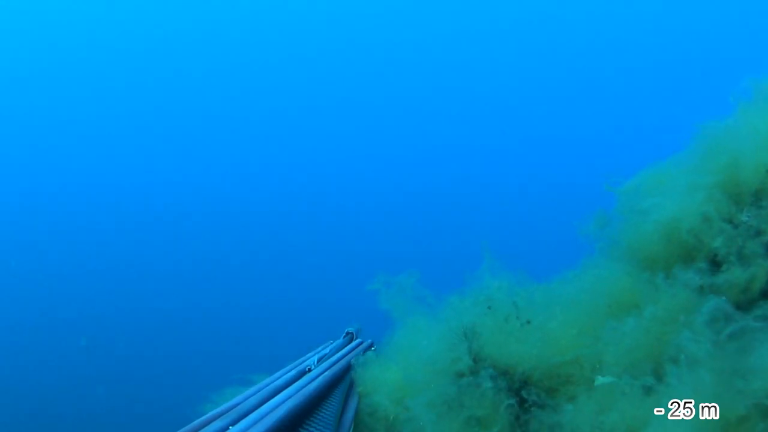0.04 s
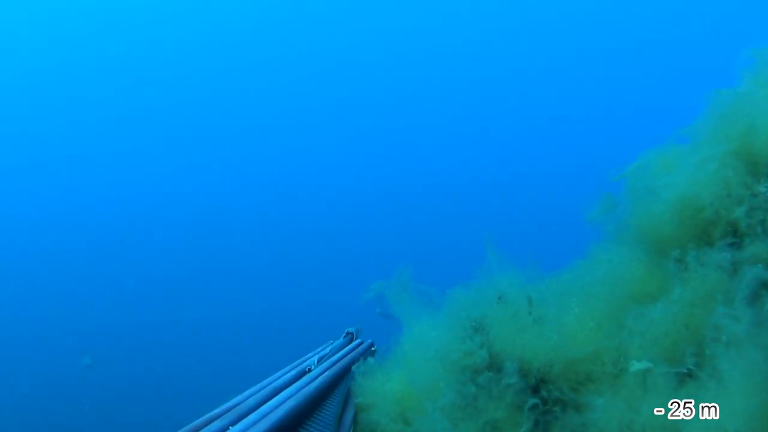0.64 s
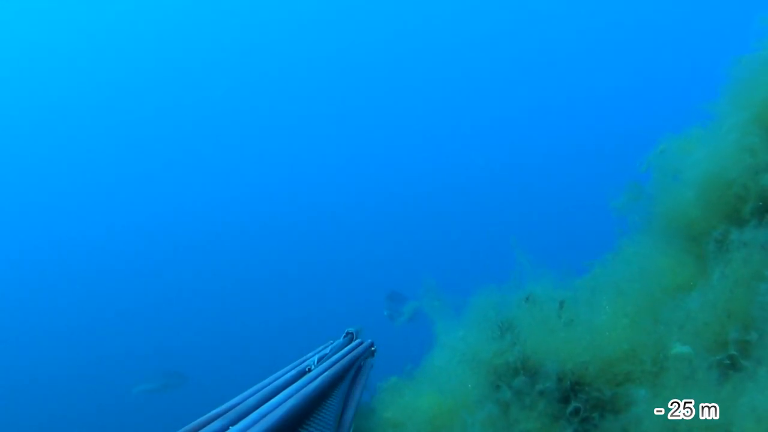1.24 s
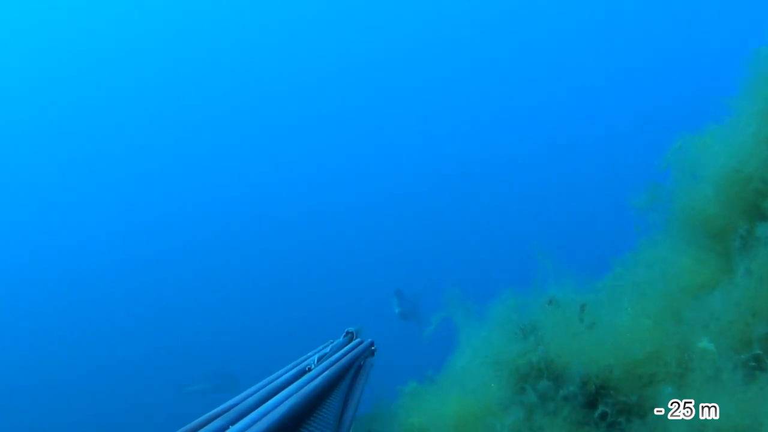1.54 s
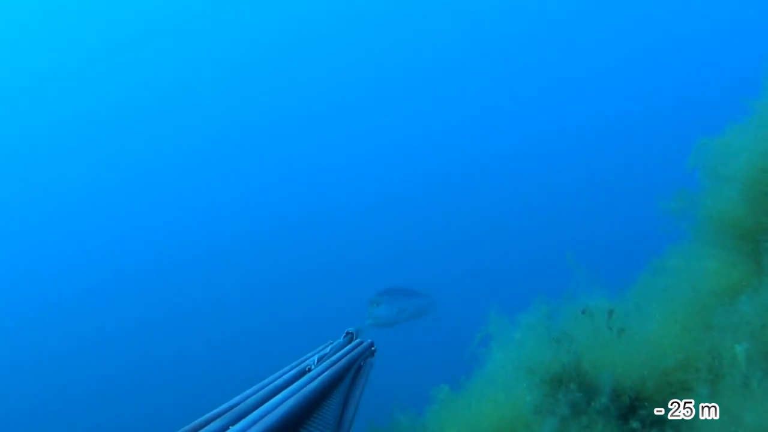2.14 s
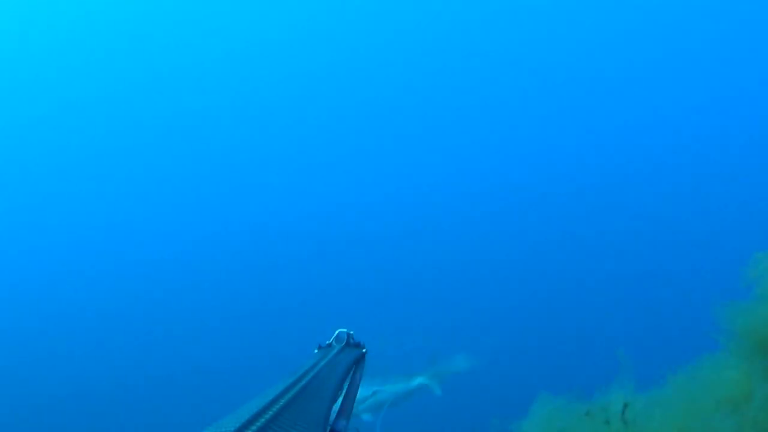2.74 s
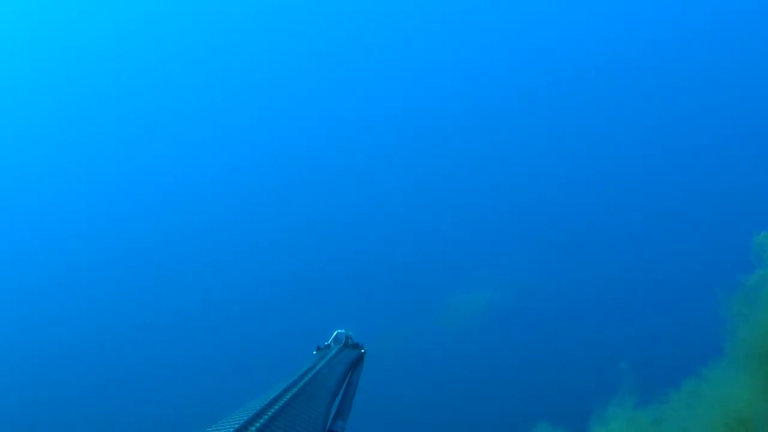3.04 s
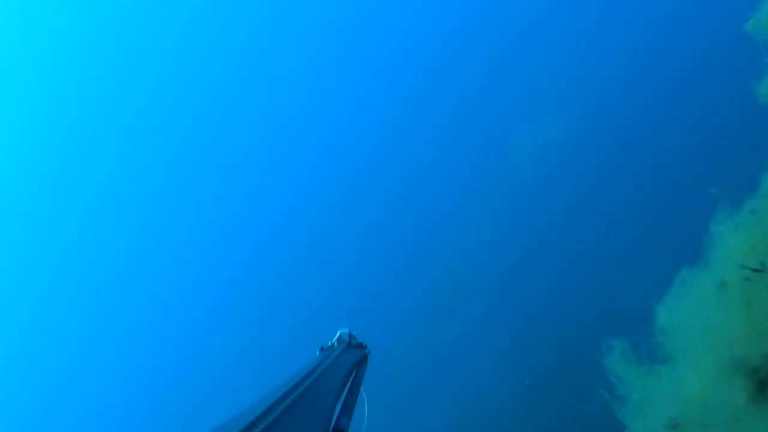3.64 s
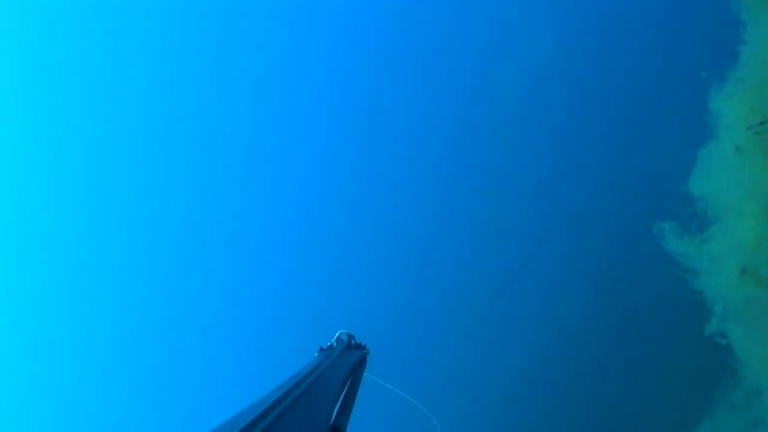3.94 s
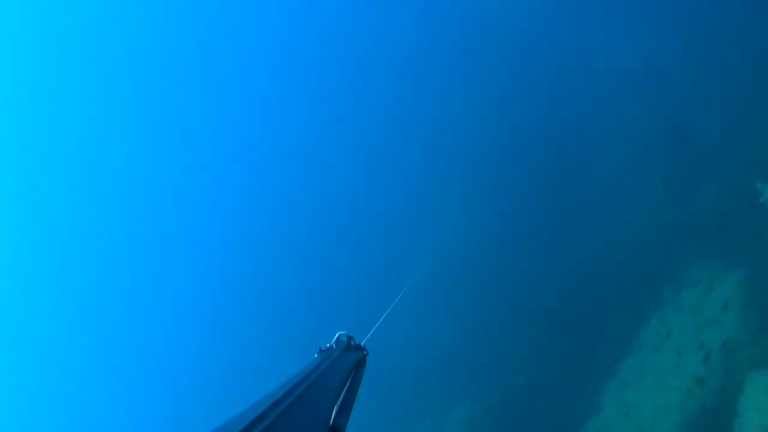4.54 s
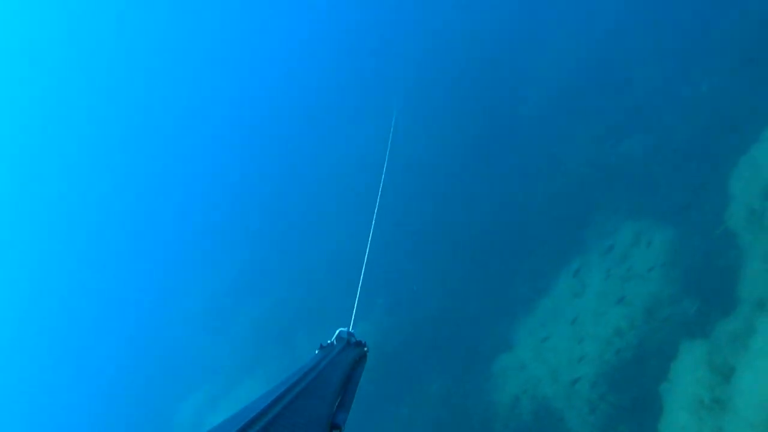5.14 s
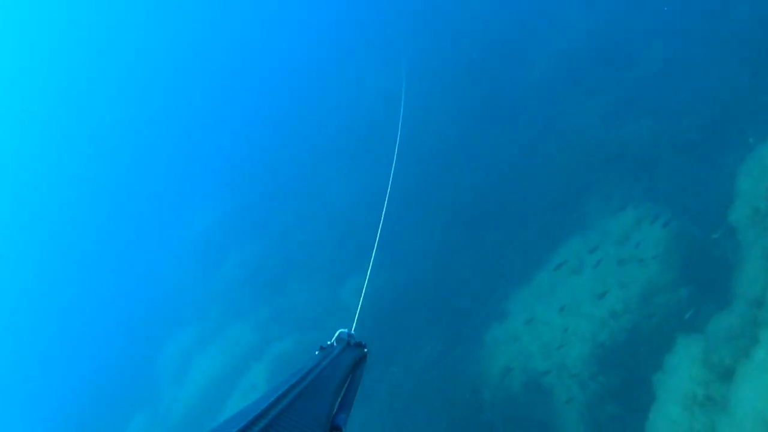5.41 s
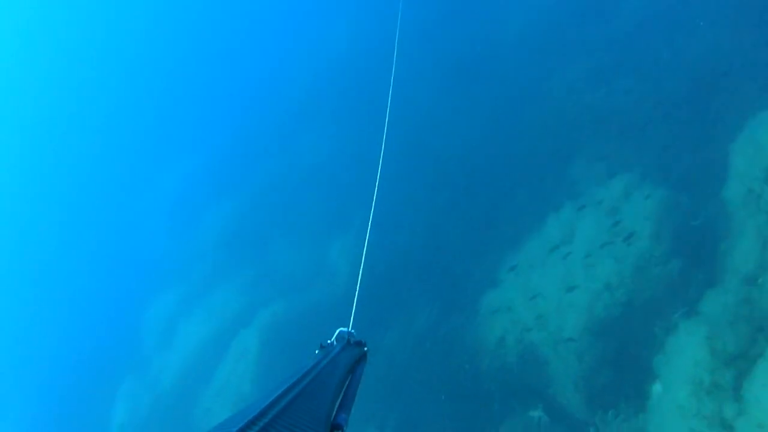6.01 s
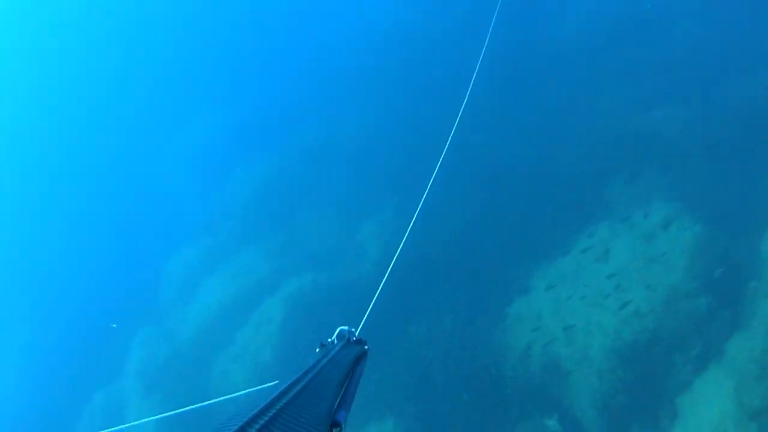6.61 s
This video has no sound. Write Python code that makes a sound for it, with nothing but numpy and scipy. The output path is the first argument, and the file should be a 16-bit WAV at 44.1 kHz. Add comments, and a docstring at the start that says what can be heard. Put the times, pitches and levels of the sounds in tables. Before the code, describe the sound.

A speargun cracks and thumps in quiet deep water, then line runs out in a long clacking rattle, ending in dull handling knocks.

```python
"""A speargun fired deep in the sea, heard through the housing of a camera fixed to the gun.
Shrimp snap over a faint hiss. The bands let go with hollow thumps and bright cracks, the shaft
clatters off the rail and the wishbone clinks at the muzzle. The line runs out in a long rattling rush,
squealing and clacking, then gives three short tugs. Dull rubs and knocks of handling and two faint whines
close the scene. The scrapes and rattles are streams of tiny contacts ringing the gun and housing."""
import sys
import numpy as np
from scipy import signal
from scipy.fft import rfft, irfft
from scipy.io import wavfile
from scipy.ndimage import uniform_filter1d, minimum_filter1d

SR = 44100
rng = np.random.default_rng(int(sys.argv[2]) if len(sys.argv) > 2 else 0)


def bounce(signal):
    """Save signal as a 16-bit WAV file at the path given by the first command-line argument."""
    frames = np.transpose(np.atleast_2d(signal))
    limited = np.clip(frames, -1, 1)
    pcm = np.round(limited * 32767).astype(np.int16)
    wavfile.write(sys.argv[1], SR, pcm)


N = 302967
FIRE_S = 2.474   # the bands let go

# Weight is a contact's bass against its mids; hardness is its treble against its mids.
# blows of bands, shaft, line and hand: start_s, level_db, weight_db, hardness_db
KNOCKS = [(1.032, -62, 4, -15), (2.4727, -6, -13, -5.5), (2.48, -7.5, -9, -9), (2.489, -17, 2, -10),
          (2.536, 0, -23, 3.5), (2.55, -4, -32, 7), (2.579, -11.5, -15, 1.5), (2.604, -2.5, -33, -2.5),
          (2.762, -16.5, -12, -4), (2.894, -27, 5.5, -16), (2.916, -32, 6, -9), (2.949, -4.5, -35, -34),
          (2.992, -4.5, -20.5, -6.5), (3.055, -2.5, -43, -18), (3.124, -4.5, -42, -20),
          (3.351, -2.5, -35, -6.5), (3.421, -2.5, -38, -20), (3.677, -3, -40, -17), (3.854, -9, -42.5, -23),
          (3.89, -9.5, -37, -24), (3.914, -11, -39, 1.5), (4.577, -3.5, -46, -16), (4.836, -30, -32, -10),
          (4.846, -22, -25, -10.5), (4.891, -31.5, -29, -1), (5.011, -1.5, -33, -50), (5.037, -6, -25, -6),
          (5.24, -20, -13.5, -24), (5.27, -16, -29, -17), (5.391, -25.5, -26, -4.5), (5.483, -19, -20, -18),
          (5.563, -11.5, -19, -20), (5.649, -3, -29.5, -64), (5.693, -3.5, -26, -4), (5.731, -28, -20, -8),
          (5.807, -26.5, -5, -18.5), (5.969, -32, -8, -3.5), (6.278, -13, -20, -18),
          (6.408, -24, -4.5, -22), (6.783, -14, -12.5, -13.5)]
# ticks of wishbone and line against the guides: start_s, level_db
GUIDE_TICKS = [(2.6588, -4.5), (2.677, -9), (2.696, -14), (2.7306, -10.5), (2.7505, -16.5), (2.792, -16.5),
               (2.9657, -18.5), (2.9944, -13), (3.0882, -10.5), (3.181, -10.5), (3.288, -12), (3.4774, -9),
               (3.5464, -12.5), (3.5857, -5), (3.7432, -7.5), (3.917, -14), (3.9911, -12), (4.0152, -5),
               (4.1381, -11), (4.3944, -10.5), (4.4915, -8.5), (5.04, -11)]
# pull on the line as it runs out, slackening midway: time_s, force_db
LINE_PULL = [(2.935, -40), (2.95, -30), (3.04, -38), (3.11, -30.5), (3.135, -27.5), (3.42, -28),
             (3.62, -21), (3.799, -26), (3.875, -36), (3.925, -30.5), (4.05, -31.5), (4.099, -22.5),
             (4.34, -25.5), (4.389, -26.5), (4.652, -26), (4.711, -53), (4.8, -85)]
# tugs on the line: start_s, hold_s, force_db, weight_db, hardness_db
LINE_TUGS = [(5.012, .085, -27.5, -23.5, -12.5), (5.111, 0.0577, -33, -18, -13),
             (5.648, .066, -32, -12.5, -8)]


def from_db(db):
    return 10 ** (np.asarray(db) / 20)


def rms_one(x):
    return x / np.sqrt(np.mean(x ** 2) + 1e-20)


def butter_filter(x, order, hz, kind="band"):
    return signal.sosfilt(signal.butter(order, hz, kind, fs=SR, output="sos"), x)


def at_hz(curve, hz):
    """Read a curve on a log-frequency axis."""
    curve_hz, values = np.transpose(curve)
    return np.interp(np.log(hz), np.log(curve_hz), values)


def level_of(s, db):
    """A dB curve as a gain at every sample, silent outside its span."""
    return from_db(np.interp(np.arange(N) / SR, s, db, left=-np.inf, right=-np.inf))


def wander(s, per_s):
    """A random drift between -2 and 2, read at the times s."""
    return np.interp(s * per_s, np.arange(4096), rng.uniform(-2, 2, 4096))


def clicks(s, sizes):
    """Impulses at the times s, each with a random phase."""
    out = np.zeros(N, complex)
    phases = np.exp(2j * np.pi * rng.random(len(s)))
    np.add.at(out, np.clip((s * SR).astype(int), 0, N - 1), sizes * phases)
    return out


def ring(force, hz, width_hz, pan_db=0.0, lead_rad=0.0):
    """A unit-energy mode swells quickly and dies away, with its own level and phase on each side."""
    poles = np.exp((2j * np.pi * hz - np.pi * np.array([width_hz, 0.28 * hz])) / SR)
    feedback = np.poly(poles)
    energy = np.sum(np.abs(signal.lfilter([1], feedback, signal.unit_impulse(SR // 10))) ** 2) / 2
    motion = signal.lfilter([1 / np.sqrt(energy)], feedback, force + 1e-18)
    sides = np.array([[.5], [-.5]])
    return np.real(motion * from_db(pan_db * sides) * np.exp(1j * lead_rad * sides))


def stroke(start_s, hold_s, force_db, attack_s, slope_db_per_s, release_s, rise_db=10, fall_db=36):
    """A push rises, swells or sags while held, then falls away. Rows: time_s, force_db."""
    end_s, end_db = start_s + hold_s, force_db + slope_db_per_s * hold_s
    return np.array([(start_s - attack_s, force_db - rise_db), (start_s, force_db),
                     (end_s, end_db), (end_s + release_s, end_db - fall_db)])


def pressed(push, weight_db, hardness_db, weighting=0.52, dulling=0.28):
    """Rubbing turns heavier and duller as a push eases. Rows: time_s, force_db, weight_db, hardness_db."""
    s, force_db = np.transpose(push)
    eased_db = force_db.max() - force_db
    return np.column_stack([s, force_db, weight_db + weighting * eased_db,
                            hardness_db - dulling * eased_db])


def slips(push, per_s, uneven_db, flutter_db, flutter_per_s, grit_db, bite_db):
    """Stick and slip breaks a push into small contacts at uneven gaps, with the same four columns."""
    when, *controls = np.transpose(push)
    jitter, size, grit = rng.uniform(-2, 2, (4000, 3)).T
    s = when[0] + (np.arange(len(jitter)) + 0.3973 * jitter) / per_s
    force_db, weight_db, hardness_db = [np.interp(s, when, control) for control in controls]
    force_db += 10 * np.log10(SR / per_s) + uneven_db * size + flutter_db * wander(s, flutter_per_s)
    # the contact turns between a soft drag and a hard bite
    hardness_db += grit_db * grit + bite_db * wander(s, flutter_per_s)
    return np.column_stack([s, force_db, weight_db, hardness_db])[s < when[-1]]


def chatter(blows, gap_s, fall_db, count=3):
    """Each blow bounces a few times, weaker every time."""
    bounces = [np.array(blows, float)]
    for _ in range(1, count):
        step = np.outer(rng.uniform(.5, 1.5, len(blows)), [gap_s, -fall_db, 0, 0])
        bounces.append(bounces[-1] + step)
    return np.vstack(bounces)


def sea(hiss_db=-61.5, hum_db=-73):
    """A smooth bed of hiss, with the wash of the water sounding the housing's resonances."""
    # tone of the hiss: frequency_hz, level_db
    hiss_spectrum = [(30, -36), (100, -18), (340, -0.5), (600, 4), (1300, 2.5), (2500, -4), (5000, -10),
                     (8000, -13), (11800, -15.5), (12600, -34)]
    # how alike left and right are: frequency_hz, correlation
    likeness = [(60, 0.67), (230, -0.54), (920, -0.83), (3580, -0.022), (14000, 0.95)]
    # housing resonances stirred by the water: pitch_hz, width_hz, level_db
    hum_modes = [(671, 53, -1), (858, 71, 0), (1884, 47, -1), (3200, 490, -3.5)]
    bins_hz = np.arange(N // 2 + 1) * SR / N + 1
    alike = np.clip(at_hz(likeness, bins_hz), -1, 1)
    mid, side = rfft(rng.standard_normal((2, N))) * from_db(at_hz(hiss_spectrum, bins_hz))
    hiss = irfft(np.sqrt(1 + alike) * mid + np.sqrt(1 - alike) * side * [[1], [-1]], N)
    hum = sum(from_db(db) * ring(rng.standard_normal(N), hz, width_hz, pan_db=-2.0, lead_rad=1.5)
              for hz, width_hz, db in hum_modes)
    return from_db(hiss_db) * rms_one(hiss) + from_db(hum_db) * hum


def shrimp(near_db=7.5, far_db=-53.5, spread_db=4.5, shoal_db=3.0, low_hz=900, count=1300):
    """Near snaps and a clustered far crackle ring the housing; so small a source has no bass."""
    # the nearest shrimp: start_s, level_db
    near_snaps = [(0.083, -35.5), (0.1384, -35), (0.2192, -15.5), (0.247, -33.5), (0.3576, -38.5),
                  (0.6712, -36.5), (0.962, -38.5), (1.394, -35.5), (1.5748, -41), (1.6602, -41),
                  (1.7802, -38), (1.808, -39), (1.947, -39.5)]
    # the housing, rung from the open water: pitch_hz, width_hz, level_db
    housing_modes = [(1950, 93, -7.5), (3087, 420, -3.5), (3670, 700, -7.5), (4000, 160, -8),
                     (4970, 540, -10), (5940, 850, -11.5), (9550, 3500, -20)]
    near_s, snap_db = np.transpose(near_snaps)
    far_s = rng.uniform(0, N / SR, count)
    crackle_db = far_db + spread_db * rng.uniform(-2, 2, count) + shoal_db * wander(far_s, 8)
    s, level_db = np.r_[near_s, far_s], np.r_[snap_db + near_db, crackle_db]
    colour_db = np.r_[np.full(len(near_s), 0.3), np.full(count, 4.0)]   # far snaps vary more in tone
    out = np.zeros((2, N))
    for hz, width_hz, db in housing_modes:
        sizes = from_db(level_db + db + colour_db * rng.uniform(-2, 2.2, len(s)))
        out += ring(clicks(s, sizes), hz, width_hz, pan_db=-5.0)
    return butter_filter(out, 2, low_hz, "high")


def knocks(gain_db=8.5, weight_db=5.0, hardness_db=-5.0):
    """Bands, shaft, line and hand strike the gun and bounce."""
    return chatter(KNOCKS, gap_s=0.002246, fall_db=5.0) + [0, gain_db, weight_db, hardness_db]


def gun_body(contacts, shift_db=2.5, shifts_per_s=110, neutral_weight_db=-20.5, neutral_hardness_db=-7):
    """Every contact rings all the gun's modes: heavy ones favour the bass, hard ones the treble."""
    # gun and camera housing: pitch_hz, width_hz, level_db, pan_db, left_lead_rad
    gun_modes = [(64, 40, -38.5, -6.5, -1), (92.0, 27.0, -38.5, -5.5, -4), (119.5, 9, -32.5, -8.5, 0),
                 (185.7, 26, -24.5, -1, 1), (241, 34, -23.5, 4.5, -1.5), (296.5, 33, -19, -6.5, 2),
                 (415.6, 37, -5, -6, -2.5), (499.3, 42, -3.5, -0.5, -1.6), (592, 120, -9, -8, 0.6),
                 (695.7, 71, -5.5, -7.5, 1.05), (829, 70, -6.5, -12.5, -1), (1029.6, 39, -6, -14, 2.0),
                 (1095, 52, 2, -5.5, -2), (1312, 124, 2, -3.1, -1.5), (1620, 170, 0, -3, -2),
                 (1803, 180, -2.1, 0.5, -0.3), (2130, 135, -4.5, -4.5, 1.8), (2494, 112, -8.5, 1.8, 0),
                 (2916, 150, -8, -8, -1.8), (3144, 366, -7.5, -0.5, 0), (3674, 63, -18.5, -3.5, 0.84),
                 (4710, 4200, -20, -3, 1.61), (7100, 3204.0, -43.5, -17, -4),
                 (10200, 1784.0, -55, -14.5, 4.5)]
    # how strongly weight drives the modes: frequency_hz, share
    weight_reach = [(190, 0.98), (300, 0.91), (430, 0.51), (800, 0.074)]
    # how strongly hardness drives the modes: frequency_hz, share
    hardness_reach = [(480, -0.11), (1100, 0.14), (1750, 0.63), (2400, 0.82), (3100, 1.085), (3600, 0.77),
                      (5000, 1.03), (10000, 1.9)]
    s, force_db, weight_db, hardness_db = contacts.T
    out = np.zeros((2, N))
    for hz, width_hz, mode_db, pan_db, lead_rad in gun_modes:
        bass_db = (weight_db - neutral_weight_db) * at_hz(weight_reach, hz)
        treble_db = (hardness_db - neutral_hardness_db) * at_hz(hardness_reach, hz)
        node_db = shift_db * wander(s, shifts_per_s)   # the contact shifts across the mode's nodes
        sizes = from_db(force_db + mode_db + bass_db + treble_db + node_db)
        out += ring(clicks(s, sizes), hz, width_hz, pan_db, lead_rad)
    return out


def shot(aim_s=2.328, wishbone_s=2.655):
    """The gun swings onto its aim, the shaft scrapes down the rail, and the wishbone rattles to rest."""
    aim = stroke(aim_s, .11, -73.5, attack_s=.01, slope_db_per_s=-115, release_s=.05)
    shaft = stroke(FIRE_S, .17, -23.5, attack_s=.002, slope_db_per_s=-72, release_s=.025)
    wishbone = stroke(wishbone_s, .2, -35.5, attack_s=.003, slope_db_per_s=-79, release_s=.045)
    return np.vstack([
        slips(pressed(aim, weight_db=-4, hardness_db=-1), per_s=500,
              uneven_db=1.5, flutter_db=1.5, flutter_per_s=90, grit_db=2.5, bite_db=2.5),
        slips(pressed(shaft, weight_db=-8, hardness_db=-6.5), per_s=1000,
              uneven_db=1.0, flutter_db=2.5, flutter_per_s=140, grit_db=1.0, bite_db=-1.7),
        slips(pressed(wishbone, weight_db=-5, hardness_db=-2), per_s=700,
              uneven_db=2.0, flutter_db=2.5, flutter_per_s=110, grit_db=3.5, bite_db=2.5)])


def band_thumps(gain_db=18.5, width_hz=75):
    """Each slap of the bands sets off a short hollow pulse."""
    # the bands hit the water: start_s, level_db, pitch_hz
    slaps = [(2.473, -9, 634), (2.479, -6, 685), (2.488, -6.5, 710), (2.518, -16, 637), (2.532, -8, 762),
             (2.558, -5, 856), (2.567, -13, 690), (2.606, -9, 746)]
    return sum(ring(clicks(np.array([s]), from_db(db + gain_db)), hz, width_hz, pan_db=-9.5)
               for s, db, hz in slaps)


def shot_cracks(gain_db=-6.5, t60_s=0.073, band_hz=(3500, 6500)):
    """Brief bright cracks of noise on the hardest blows of the shot."""
    # bright cracks: start_s, level_db
    cracks = [(2.4732, -13), (2.526, -25), (2.532, -13), (2.5515, -23), (2.605, -23), (2.6788, -24.5)]
    s, level_db = np.transpose(cracks)
    onsets = np.abs(clicks(s, from_db(level_db))) + 1e-18
    envelope = signal.lfilter([1], [1, -from_db(-60 / (t60_s * SR))], onsets)
    fizz = rng.standard_normal(N) + 0.94 * rng.standard_normal((2, N))
    return from_db(gain_db) * butter_filter(envelope * fizz, 1, band_hz)


def wash(force_db=-62, weight_db=-3, hardness_db=-19):
    """From the shot on, water keeps stirring softly round the moving gun."""
    flow = [(s, force_db, weight_db, hardness_db) for s in (FIRE_S, N / SR)]
    return slips(flow, per_s=600, uneven_db=-1.5, flutter_db=3, flutter_per_s=25, grit_db=-2, bite_db=8)


def muzzle_clinks(gain_db=12.5):
    """Steel meets steel, bounces and rings briefly."""
    # metal hits at the muzzle: start_s, level_db
    hits = [(2.657, -5.5), (2.6733, -10), (2.6844, -12), (2.7346, -19), (2.9312, -12.5), (5.626, -24.5),
            (5.7144, -16)]
    # the muzzle's steel: pitch_hz, width_hz, level_db
    steel_modes = [(3046, 350, -4), (3320, 480, -3.5), (3720, 230, -10.5), (4220, 230, -19.5)]
    s, hit_db, _, _ = chatter([(s, db, 0, 0) for s, db in hits], gap_s=0.0016, fall_db=1.5).T
    return sum(ring(clicks(s, from_db(gain_db + hit_db + db)), hz, width_hz, pan_db=-4.0)
               for hz, width_hz, db in steel_modes)


def guide_ticks(gain_db=-5.0, weight_db=-18.0, hardness_db=9.0):
    """Wishbone and line tap the guides with hard, quick bounces."""
    taps = [(s, db + gain_db, weight_db, hardness_db) for s, db in GUIDE_TICKS]
    return chatter(taps, gap_s=.0011, fall_db=3.0, count=4)


def running_line(weight_db=-31.0, hardness_db=-5.5, dulling_db_per_s=3.5, recoil_db=21, settle_s=0.19):
    """The line rattles through its guides, heavy until the recoil settles, and slowly dulls."""
    since_s = np.array(LINE_PULL)[:, 0] - LINE_PULL[0][0]
    run = pressed(LINE_PULL, weight_db + recoil_db * np.exp(-since_s / settle_s),
                  hardness_db - dulling_db_per_s * since_s)
    return slips(run, per_s=480, uneven_db=.04, flutter_db=2.5, flutter_per_s=105, grit_db=.1, bite_db=.5)


def sticking(contacts, stick_s=0.01, dip_db=3):
    """The line sticks and grows quieter just before each knock or tick."""
    ahead_s = np.array([row[0] for row in KNOCKS + GUIDE_TICKS]) - contacts[:, :1]
    stuck = ((ahead_s > 0) & (ahead_s < stick_s)).any(axis=1)
    return contacts - np.outer(stuck, [0, dip_db, 0, 0])


def line_force():
    """The pull of the long run and of the tugs, as a gain at every sample."""
    tugs = sum(level_of(tug[:, 0], tug[:, 1]) for tug in tug_strokes())
    return level_of(*np.transpose(LINE_PULL)) + tugs


def line_squeals(gain_db=10.0, uneven_db=2.0, pitch_hz=1110, spread=0.0085, length_s=0.026,
                 pan_db=-10.5, lead_rad=-1.65, count=62):
    """The line's friction locks briefly onto the strongest mode, as loud as the pull is hard."""
    out, sides = np.zeros((2, N)), np.array([[.5], [-.5]])
    swell, pull = np.hanning(int(length_s * SR)), line_force()
    moments, gap_s = np.linspace(LINE_PULL[0][0], LINE_TUGS[-1][0], count, retstep=True)
    for s, (shift, size, detune, phase) in zip(moments, rng.uniform(-2, 2, (count, 4))):
        turns = pitch_hz * (1 + spread * detune) * np.arange(len(swell)) / SR + phase
        tone = np.sin(2 * np.pi * turns + lead_rad * sides)
        start = int((s + .2 * shift * gap_s) * SR)
        span = slice(start, start + len(swell))
        out[:, span] += from_db(gain_db + uneven_db * size + pan_db * sides) * pull[span] * swell * tone
    return out


def line_clacks(gain_db=23.5, uneven_db=2.5, pitch_hz=2200, width_hz=1200, count=70):
    """The moving line slaps the barrel at uneven moments with short dry clacks."""
    moments, gap_s = np.linspace(LINE_PULL[0][0], LINE_TUGS[-1][0], count, retstep=True)
    slaps = [(s + .25 * shift * gap_s, gain_db + uneven_db * size, 0, 0)
             for s, (shift, size) in zip(moments, rng.uniform(-2, 2, (count, 2)))]
    s, slap_db, _, _ = chatter(slaps, gap_s=0.00161, fall_db=2.0).T
    force = clicks(s, from_db(slap_db)) * line_force()
    return ring(force, pitch_hz, width_hz, pan_db=-3.0, lead_rad=-0.35)


def rub_strokes():
    """Each shift of the hand swells and fades softly."""
    # the hand shifts on the stock: start_s, hold_s, force_db, weight_db
    rubs = [(4.889, .05, -43, -27), (4.963, .035, -44, -4), (5.276, .015, -49.5, -4.5),
            (5.369, .18, -44.5, -8.5), (5.572, .025, -43, -4.5), (5.645, .075, -40, -4),
            (5.757, .1, -54.5, -8.5), (5.978, .16, -46, -9.5), (6.155, .08, -39, -16.5),
            (6.292, .04, -39, -11.5), (6.386, .07, -47, 0.5), (6.488, .2, -56, 1), (6.712, .06, -44.5, -7),
            (6.795, .075, -41, -11)]
    return [pressed(stroke(s, hold_s, db, attack_s=.025, slope_db_per_s=6, release_s=.08),
                    weight_db, hardness_db=-20.5) for s, hold_s, db, weight_db in rubs]


def grip(gain_db=-3.0):
    """The heavy part of the rubs and tugs drums on the stock."""
    # the stock as the hand holds it: pitch_hz, width_hz, level_db
    stock_modes = [(124.1, 2.6, -14), (310.7, 6.1, -4.5), (454, 26, 9)]
    heft = sum(level_of(push[:, 0], push[:, 1] + push[:, 2]) for push in tug_strokes() + rub_strokes())
    return sum(from_db(gain_db + db) * ring(heft * rng.standard_normal(N), hz, width_hz, pan_db=-11.0)
               for hz, width_hz, db in stock_modes)


def tug_strokes():
    """Each tug snatches the line tight, holds and lets go."""
    return [pressed(stroke(s, hold_s, db, attack_s=.008, slope_db_per_s=-2, release_s=.055),
                    weight_db, hardness_db) for s, hold_s, db, weight_db, hardness_db in LINE_TUGS]


def tug_sizzle(gain_db=-19.5, band_hz=(4200, 7000), flutter_db=6.0, flutter_per_s=200):
    """Fine friction of the line follows the force and hardness of each tug."""
    level = sum(level_of(tug[:, 0], tug[:, 1] + tug[:, 3]) for tug in tug_strokes())
    grain = rng.standard_normal(N) + .7 * rng.standard_normal((2, N))
    flutter = from_db(flutter_db * wander(np.arange(N) / SR, flutter_per_s))
    return from_db(gain_db) * level * rms_one(butter_filter(grain * flutter, 2, band_hz))


def line_whines(waver_hz=14, waver_per_s=40):
    """Thin wavering tones swell and fade as the line comes taut."""
    # tones of the taut line: start_s, length_s, pitch_hz, level_db
    whines = [(6.46, 0.34, 1022, -45.5), (6.62, .18, 4540, -70.5)]
    t, out = np.arange(N) / SR, np.zeros(N)
    for start_s, length_s, hz, db in whines:
        swell = np.sin(np.pi * np.clip((t - start_s) / length_s, 0, 1))
        turns = np.cumsum(hz + waver_hz * wander(t, waver_per_s)) / SR
        out += from_db(db) * swell * np.sin(2 * np.pi * turns)
    return out


def scene():
    """Over the ambience, all scrapes and knocks ring one gun body; the other layers sit on top."""
    ambience = sea() + shrimp()
    rubs = [slips(rub, per_s=700, uneven_db=1, flutter_db=3, flutter_per_s=77, grit_db=2.5, bite_db=4)
            for rub in rub_strokes()]
    tugs = [slips(tug, per_s=500, uneven_db=1, flutter_db=3.5, flutter_per_s=100, grit_db=-.9, bite_db=0)
            for tug in tug_strokes()]
    contacts = np.vstack([knocks(), shot(), wash(), guide_ticks(), sticking(running_line()), *rubs, *tugs])
    return (ambience + gun_body(contacts) + band_thumps() + shot_cracks() + muzzle_clinks()
            + line_squeals() + line_clacks() + grip() + tug_sizzle() + line_whines())


def record(dry, ceiling=0.62, release_db_per_s=300, band_hz=(24, 12000), cutoff_hz=13800):
    """A fast limiter holds the peaks down; the deep bass and the top fall away."""
    release_db = release_db_per_s * np.arange(N) / SR
    over_db = 20 * np.log10(np.maximum(np.abs(dry).max(axis=0) / ceiling, 1))
    held_db = np.maximum.accumulate(over_db + release_db) - release_db
    gain = uniform_filter1d(minimum_filter1d(from_db(-held_db), size=45), size=45)
    coloured = butter_filter(dry * gain, 2, band_hz)
    return signal.sosfilt(signal.ellip(10, .1, 80, cutoff_hz, fs=SR, output="sos"), coloured)


dry = scene()
out = record(dry)
bounce(out)
```